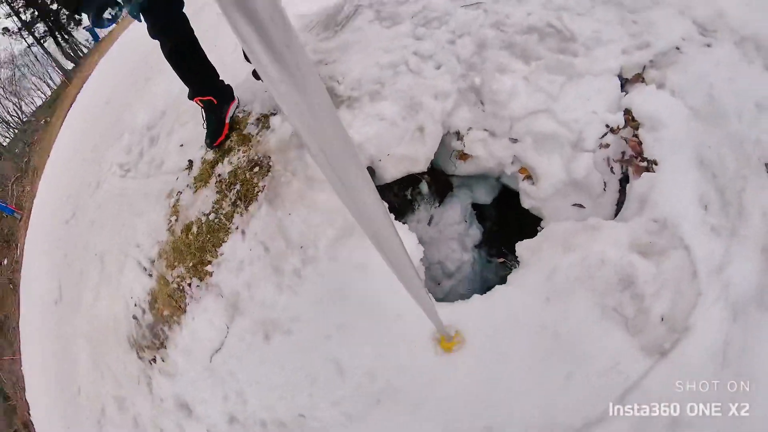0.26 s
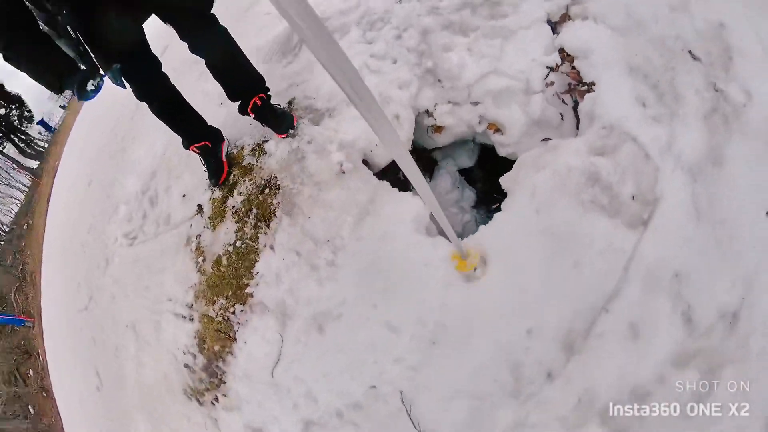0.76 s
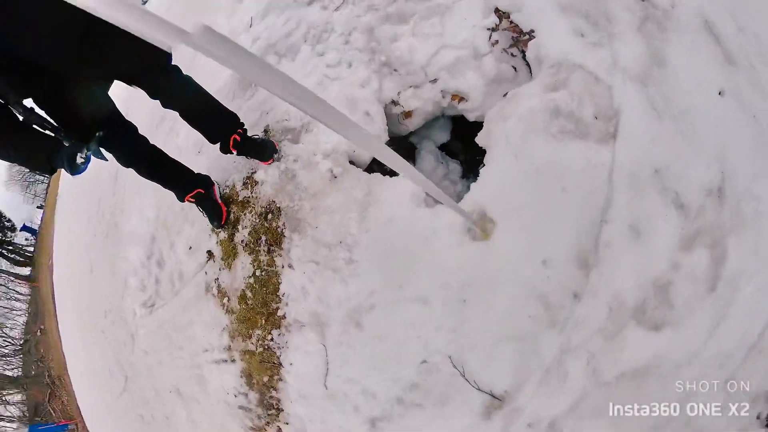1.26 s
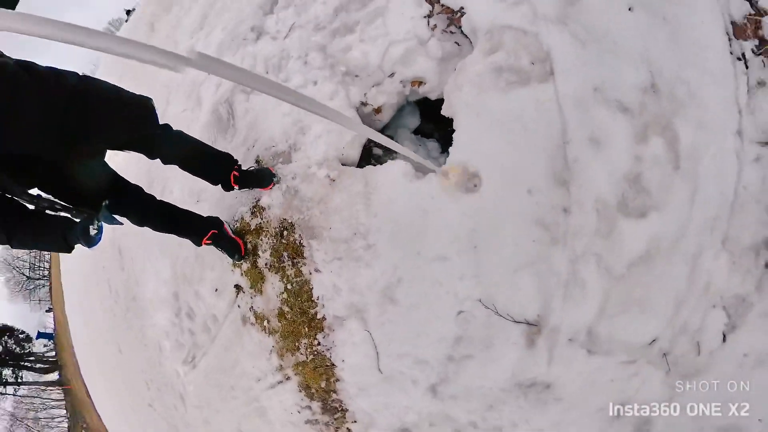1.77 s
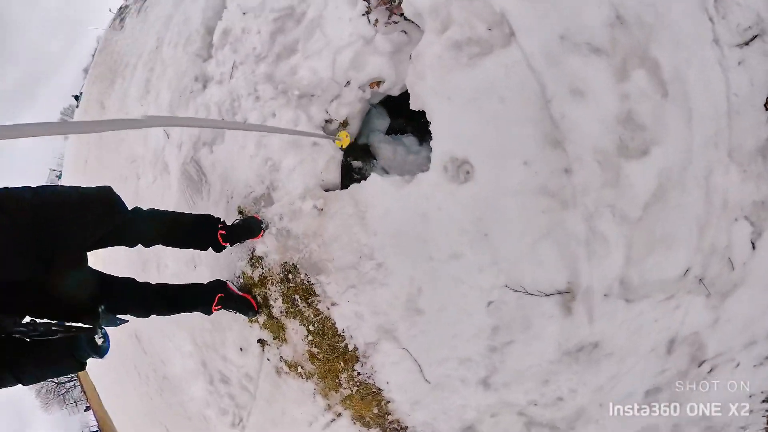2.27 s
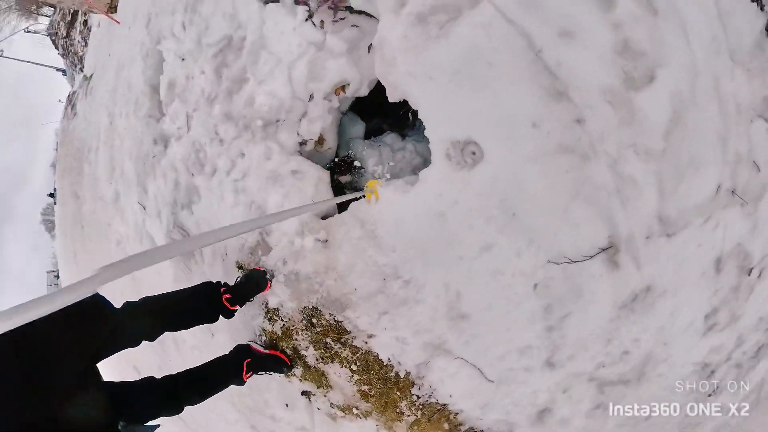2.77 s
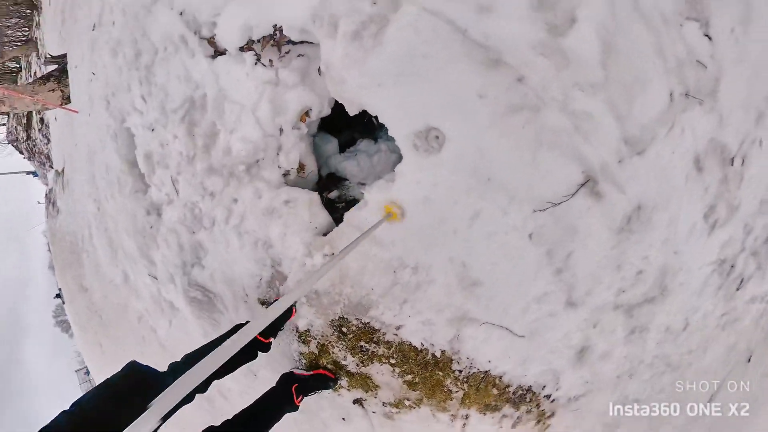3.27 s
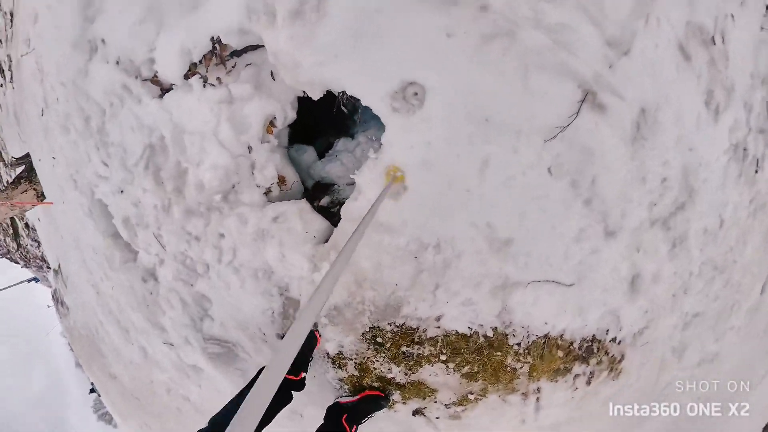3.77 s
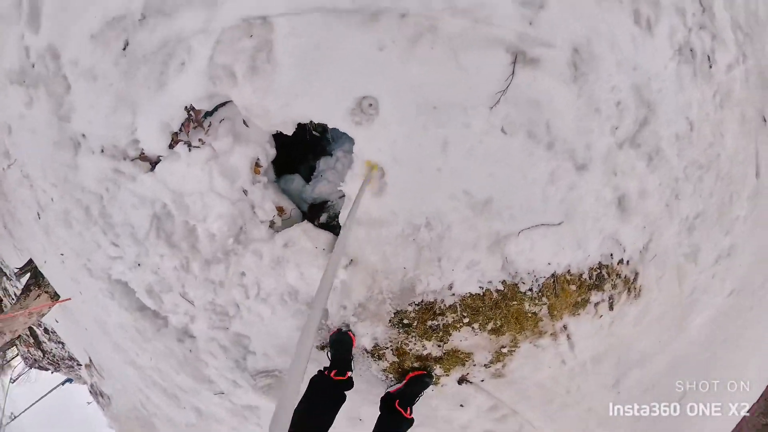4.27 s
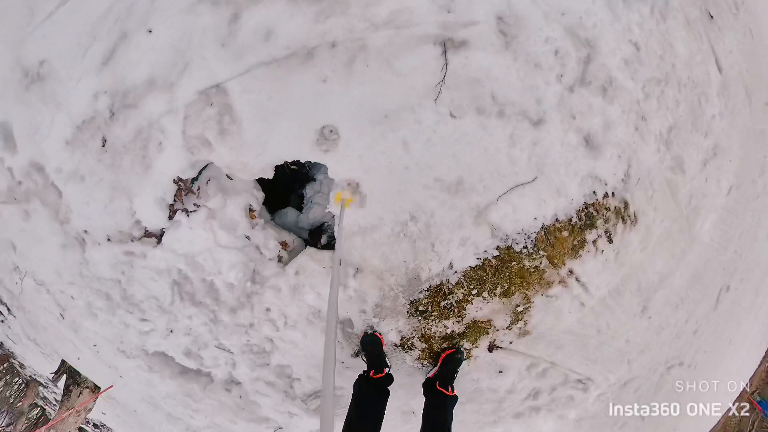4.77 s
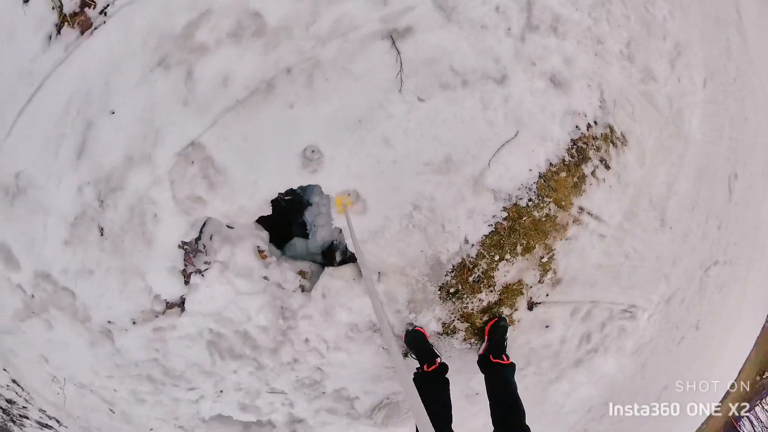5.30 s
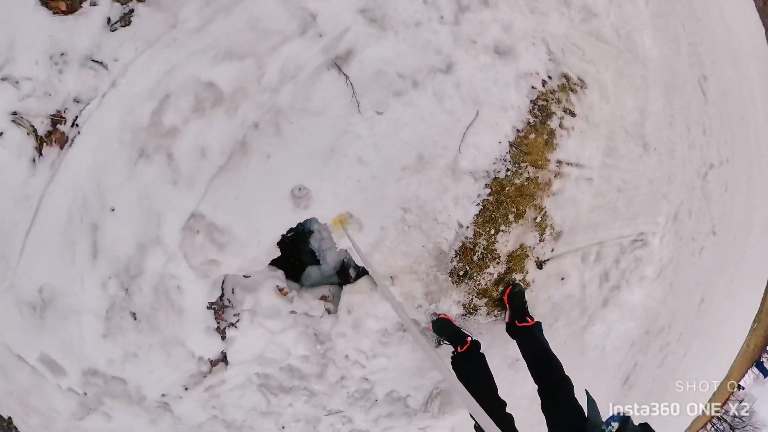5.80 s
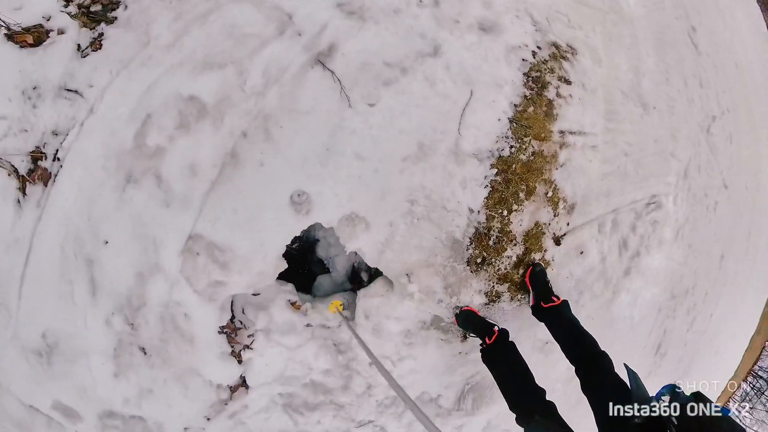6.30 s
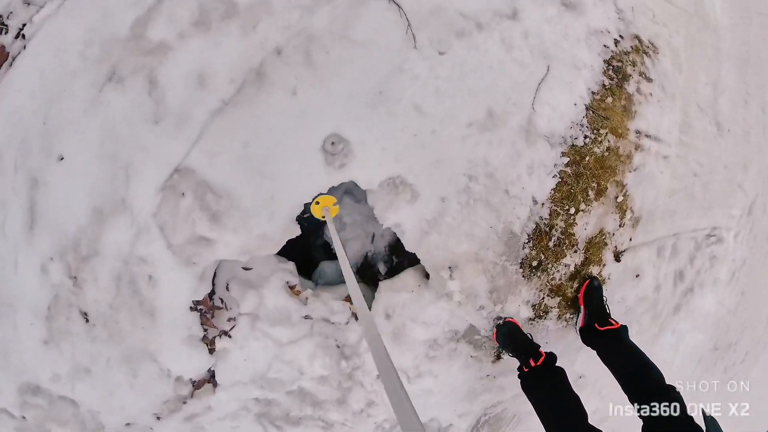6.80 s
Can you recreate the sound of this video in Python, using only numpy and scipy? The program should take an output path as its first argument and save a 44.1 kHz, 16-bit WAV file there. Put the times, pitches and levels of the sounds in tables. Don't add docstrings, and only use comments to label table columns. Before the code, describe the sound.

Outdoors on an open snowy slope, soft low wind rumble and a faint, wavering hiss begin alone. At 0.33 s a pole stabs the crust close to the microphone with a bright crack; heavier, duller crunches follow at about 0.7, 1.0, 1.3 and 1.65 s, the last with a strong low thump. Each lasts only a few hundredths of a second, then lumps settle and icy crumbs tick. Wind puffs flutter low around 0.95, 1.4 to 2.0 and 4.3 s. A jab at 2.2 s is followed by a longer pause until 2.84 s. Regular stabs resume at 3.2 and 3.5 s; at 3.83 s one brings a deep, quickly dying hollow boom. From 4.1 s crisp, sharper jabs come about every quarter second until a grainy double crunch near 6.2 s. Fine crumbs trickle briefly, leaving quiet wind until 7 s. The sound is dry, close, nearly mono, with softened extreme treble.

```python
import sys
import numpy as np
from scipy import signal
from scipy.fft import rfft, irfft
from scipy.io import wavfile

SR = 44100
rng = np.random.default_rng(int(sys.argv[2]) if len(sys.argv) > 2 else 0)


def nominal_scale(level):
    x = np.asarray(level, float) / 20
    return 10 ** x


def inscribe(sig):
    pcm = np.round(np.clip(np.atleast_2d(sig).T, -1, 1) * 32767)
    wavfile.write(sys.argv[1], SR, pcm.astype(np.int16))


N = 310905

GRAIN_HZ = np.array([np.geomspace(160, 700, 6), np.geomspace(850, 2600, 6), np.geomspace(3000, 8000, 6)])


def rms_one(x):
    return x / np.sqrt(np.mean(x ** 2) + 1e-20)


def at_hz(points, hz):
    point_hz, point_db = np.array(points).T
    return np.interp(np.log(hz), np.log(point_hz), point_db)


def drift(rate_hz):
    r = np.exp(-80 * np.pi * rate_hz / SR)
    slow = signal.lfilter([1], [1, -2 * r, r * r], rng.standard_normal(N // 40 + 2002))
    slow = slow[2000:]
    return np.interp(np.arange(N) / 40, np.arange(len(slow)), rms_one(slow))


def band(x, low_hz, high_hz, order=2):
    return signal.sosfilt(signal.butter(order, [low_hz, high_hz], "band", fs=SR, output="sos"), x)


def coloured(spectrum):
    hz = np.maximum(np.fft.rfftfreq(N, 1 / SR), 1)
    inside = (hz > spectrum[0][0]) & (hz < spectrum[-1][0])
    return rms_one(irfft(rfft(rng.standard_normal(N)) * nominal_scale(at_hz(spectrum, hz)) * inside, N))


def air():
    # time in seconds, rumble level in dB, hiss level in dB.
    wind_levels = [(0, -43, -53.5), (.7, -41, -54), (1.2, -43.5, -57), (1.7, -40.5, -54), (2.2, -44, -54.5),
                   (2.8, -45, -55.5), (3.3, -45, -57), (3.7, -45.5, -58), (3.95, -47, -56.5),
                   (4.299, -43, -58.5), (4.75, -45, -57), (5.7, -46, -58), (6.3, -47, -58),
                   (7.05, -46, -59)]
    # frequency in Hz, density in dB per Hz.
    rumble_spectrum = [(12, -51), (20, -17), (53, -0.5), (98, -11.5), (479, -24), (520, -24.5), (573, -25),
                       (1000, -35.5), (1300, -68.5), (2200, -120)]
    # frequency in Hz, density in dB per Hz.
    hiss_spectrum = [(530, -8.5), (900, -6.5), (1150, -5.5), (1280, -2.5), (1480, -5), (6560, -9),
                     (9120, -24.5), (11900, -74.5), (20100, -120)]
    s, rumble_db, hiss_db = np.transpose(wind_levels)
    t = np.arange(N) / SR
    rumble = nominal_scale(np.interp(t, s, rumble_db) + 0.45 * drift(11)) * coloured(rumble_spectrum)
    level, steady = nominal_scale(np.interp(t, s, hiss_db)), coloured(hiss_spectrum)
    edges_hz = [500, 900, 1400, 2000, 2700, 3500, 4400, 5400, 6500, 7800, 11000]
    patches = np.zeros(N)
    for low_hz, high_hz in zip(edges_hz, edges_hz[1:]):
        patch_db = 2.3 * (drift(9) + 0.4 * drift(26))
        patches += nominal_scale(patch_db) * band(steady, low_hz, high_hz, order=1)
    return rumble, level * rms_one(patches), level * coloured(hiss_spectrum)


def jab_bursts():
    # start in seconds, rms level in dB, length in ms, thud in dB, pitch of the breaking slab in Hz.
    jabs = [(0.3342, -20.5, 12.3, -6.5, 4500), (0.6871, -19, 20, -0.7, 560), (1.0103, -20, 20.8, -1.7, 604),
            (1.322, -22.5, 18.4, -2.5, 1620), (1.649, -25.5, 16, 3, 816), (2.188, -22.5, 19, -11.5, 2220),
            (2.8376, -24.5, 15.6, -1, 940), (3.2123, -23, 12, 1.7, 1550), (3.536, -21.5, 19.2, -7, 560),
            (3.8268, -18, 12.9, -3.5, 575), (4.119, -16, 6.9, -3, 1405), (4.41, -24, 17, -4, 1670),
            (4.6827, -20, 6, -5.5, 1900), (4.938, -20, 15.2, -4.5, 2220), (5.1978, -24, 10.1, -8, 2180),
            (5.4437, -25, 24.5, -14, 1380), (5.705, -19, 9.2, -4.5, 2870), (5.9491, -24.5, 8, -7.5, 1950),
            (6.176, -20.5, 29, -19.5, 1035)]
    brush_ms = 19.5
    rows = []
    for s, level_db, ms, thud_db, slab_hz in jabs:
        rows += [(s - brush_ms / 1000, -48.5, brush_ms, 5, 0),
                 (s, level_db, ms, 2.74, thud_db, slab_hz),
                 (s + ms / 1000, level_db - 21, 6.2, 0, 3)]
    return rows


def crack_bursts():
    # start in seconds, rms level in dB, length in ms, brightness in dB.
    cracks = [(0.3282, -28.5, 2.9, 19), (0.3469, -29, 10.2, -1.2), (0.3634, -32, 9.3, -15),
              (0.379, -39, 15, -14), (0.399, -40, 11, -16), (0.706, -35, 9, 10), (1.044, -22, 4, -4.5),
              (1.374, -43, 4, -3), (1.656, -22, 4.2, -4), (2.201, -23, 3.3, -1), (2.1727, -33.5, 5, -1.5),
              (2.8546, -25, 23.8, 3.5), (3.5582, -32, 1.1, 3), (3.8413, -32.5, 11, -8),
              (4.1282, -20.5, 7, -1), (4.42, -19.5, 7.2, 3.5), (4.6926, -19, 7.7, -1),
              (4.715, -41.5, 11, -3), (4.7348, -40.5, 9.6, -17), (4.9562, -27.5, 5.5, 3),
              (5.1884, -28.5, 2.7, -1), (5.4772, -34.5, 12.3, .6), (5.4975, -37, 10, 9.5),
              (5.5108, -28, 12.3, 9), (5.5498, -38, 6.7, .6), (5.5897, -40.5, 8.6, -4),
              (5.6856, -42, 22, 7), (5.9399, -34, 16.4, 1.5), (6.166, -27.5, 12, 4),
              (6.2072, -26, 23.3, -0.5)]
    return [(*row, -5) for row in cracks]


def settling_bursts():
    # start in seconds, rms level in dB, length in ms, thud in dB.
    settling = [(0.41, -42.5, 18, 13), (0.7134, -43, 24, 3.5), (1.051, -50, 18, -4),
                (1.3418, -39.5, 38, -2), (1.668, -38.5, 40, -6), (2.21, -50, 35, 0), (2.88, -48, 12, -6),
                (3.224, -48.5, 20, 4), (3.563, -47.5, 16, -1), (3.847, -53.5, 12, 4),
                (4.1408, -41.5, 28, 3.5), (4.43, -43, 42, -2), (4.701, -39, 34, 7), (4.9633, -46, 40, -1.2),
                (5.211, -43.5, 44, 2.5), (5.472, -46, 66, -9), (5.718, -42.5, 46, -3.5),
                (5.9624, -49, 32, 1.2), (6.2324, -44.5, 19, -20)]
    lump_ms, gap_ms = 10.5, 9.5
    rows = []
    for (s, level_db, ms, thud_db), luck in zip(settling, rng.standard_normal((len(settling), 8, 4))):
        for k, (late, weight, tint, size) in enumerate(luck):
            after_ms = k * gap_ms
            lump_db = level_db + 2.5 * weight - 7.5 * after_ms / ms
            lump_db -= 99 * (after_ms >= ms)
            lump_hz = 2320 * 2 ** (0.7 * size)
            rows.append((s + (after_ms + 2 * late) / 1000, lump_db, lump_ms, 3 * tint, thud_db, lump_hz))
    return rows


def crumb_bursts():
    # start in seconds, rms level in dB, length in ms, brightness in dB.
    crumbs = [(0.466, -50, 37, -4.5), (0.806, -47, 16.5, -1), (0.8357, -48, 5, -5), (1.15, -46, 20, -2.5),
              (1.391, -50, 10, -3), (1.412, -49, 9.5, -1), (1.472, -50, 13, -9.5), (1.79, -50.5, 27.5, -2),
              (3.375, -53, 25, 1), (3.675, -53.5, 30, 1), (3.973, -46.5, 25, -7), (4.258, -50, 32, -2.5),
              (4.5512, -50.5, 15.6, -12), (5.0426, -50, 14, -1.5), (5.0764, -48.5, 6, -11.5),
              (5.308, -51.5, 12, 0), (5.34, -51.5, 11, 2), (5.8151, -43, 9.5, 6), (6.06, -51.5, 9.6, -1),
              (6.0913, -46, 5, 3), (6.33, -57, 90, 11.5), (6.365, -52.5, 18, 13), (0.391, -36, 5.4, -10),
              (2.39, -70, 16, -9)]
    return [(*row, 1.5, 1300) for row in crumbs]


def tick_bursts():
    # start in seconds, rms level in dB, pitch in Hz.
    ticks = [(0.795, -46, 3530), (1.4696, -36.5, 1350), (1.5628, -45, 3100), (1.714, -52.5, 1200),
             (1.7372, -45.5, 3060), (1.799, -62, 1700), (1.869, -50, 6300), (2.4, -49, 1700),
             (2.455, -50, 5900), (2.9885, -43.5, 4500), (3.0138, -46.5, 5530), (3.32, -48, 6700),
             (4.842, -49, 1300), (5.058, -40.5, 1600), (5.324, -46, 2100), (5.5715, -48, 2000),
             (5.7807, -53, 4870)]
    return [(s, level_db, 2.8, 0, -6.5, hz, hz) for s, level_db, hz in ticks]


def burst_shapes(energy):
    rows = jab_bursts() + tick_bursts() + crack_bursts() + crumb_bursts() + settling_bursts()
    rise_ms, rise_share, fall_ms = 0.6, 0.03, 0.9
    slab_lift_db, slab_octaves = 6.0, 0.3
    shapes, colours = np.zeros((3, 6, N)), rng.standard_normal((len(rows), 3, 6))
    for (s, level_db, ms, bright_db, thud_db, *slabs), colour in zip(rows, colours):
        hold_ms = max(ms, 0.3)
        t_ms = np.arange(int((hold_ms + 10) * SR / 1000)) * 1000 / SR
        rise = 1 - np.exp(-(t_ms / (rise_ms + rise_share * hold_ms)) ** 2)
        sag = 0.3 * t_ms / hold_ms
        shape = rise * np.exp(-sag - np.maximum(t_ms - hold_ms, 0) / fall_ms)
        middle_db = level_db - 10 * np.log10(1 + nominal_scale(bright_db) ** 2)
        grain_db = middle_db + np.array([[thud_db], [0], [bright_db]]) + 2.4 * colour
        for slab_hz in slabs:
            octaves_off = np.log2(GRAIN_HZ / slab_hz)
            grain_db = grain_db + slab_lift_db * np.exp(-(octaves_off / slab_octaves) ** 2)
        span = slice(int(s * SR), int(s * SR) + len(t_ms))
        spent = energy[:, span] @ shape ** 2 / np.sum(shape ** 2)
        shapes[..., span] += (nominal_scale(grain_db) / np.sqrt(spent + 0.1))[..., None] * shape
    return shapes


def crust():
    # frequency in Hz, level in dB.
    radiation = [(180, 0.5), (400, 4), (1000, 0), (2200, 1.5), (4000, 2), (6300, 5), (8000, -39)]
    snaps_per_s, snap_spread_db, ring_cycles = 11000, 3.0, 5.0
    strengths = nominal_scale(snap_spread_db * np.minimum(rng.exponential(1, N), 4)) * rng.choice([-1, 1], N)
    clumps = nominal_scale(3.5 * drift(170))
    snaps = clumps * strengths * (rng.random(N) < snaps_per_s / SR)
    dealt = rng.integers(0, 6, N)
    hands = np.array([rms_one(snaps * (dealt == k)) for k in range(6)])
    out = np.zeros(N)
    for shapes, pitches in zip(burst_shapes(hands ** 2), GRAIN_HZ):
        for shape, own_snaps, hz in zip(shapes, hands, pitches):
            r, w = nominal_scale(-60 * hz / (ring_cycles * SR)), 2 * np.pi * hz / SR
            ring = [[1, 0.012, -0.982, 1, -2 * r * np.cos(w), r * r]] * 2
            scale = np.linalg.norm(signal.sosfilt(ring, signal.unit_impulse(4096)))
            ringing = signal.sosfilt(ring, own_snaps * shape + 1e-18)
            out += nominal_scale(at_hz(radiation, hz) - 7.5) / scale * ringing
    return out


def bend_diaphragm(rows):
    out, phases = np.zeros(N), rng.uniform(0, 2 * np.pi, len(rows))
    for (s, peak_db, hz, ms), phase in zip(rows, phases):
        half = int(3 * ms * SR / 1000)
        t = np.arange(-half, half) / SR
        bell = np.exp(-(t * 1000 / (0.45 * ms)) ** 2)
        at = int(s * SR)
        out[at - half:at + half] += nominal_scale(peak_db) * bell * np.cos(2 * np.pi * hz * t + phase)
    return out


def jolts():
    # centre in seconds, peak level in dB, pitch in Hz, length in ms.
    shakes = [(0.337, -17.5, 252, 11.3), (0.391, -36, 127, 47), (0.706, -18, 214, 7.7),
              (0.772, -32, 48.3, 62), (1.056, -24.5, 52, 17), (1.354, -22, 64.5, 42),
              (1.663, -8.5, 142, 5.5), (3.221, -38.5, 145, 51), (3.564, -45, 134, 48),
              (3.862, -19.5, 130, 12), (3.872, -32.5, 298, 31), (4.132, -27, 98, 19),
              (4.427, -21.5, 102.4, 36), (4.711, -25.5, 88.6, 23), (5.207, -22.5, 180, 3.1),
              (5.462, -19, 144, 3.8), (5.713, -17.5, 165, 1.6), (5.973, -24, 63, 17), (6.2, -47, 134, 110)]
    return bend_diaphragm(shakes)


def booms():
    # start in seconds, peak level in dB, start pitch in Hz, end pitch in Hz, 60 dB decay in seconds.
    drops = [
        (3.857, -19, 280, 40.1, 0.45),
        (1.5, -31.5, 245, 81, 0.24),
        (3.5, -34.5, 100, 50, 0.42),
        (0.8, -28, 48, 77, 0.28),
        (0.71, -42, 57, 150, 0.23),
    ]
    out, t = np.zeros(N), np.arange(SR // 2) / SR
    for s, peak_db, start_hz, end_hz, t60 in drops:
        hz = end_hz + (start_hz - end_hz) * np.exp(-t / 0.0046)
        at = int(s * SR)
        out[at:at + len(t)] += nominal_scale(peak_db - 60 * t / t60) * np.sin(2 * np.pi * np.cumsum(hz) / SR)
    return out


def gusts():
    # centre in seconds, peak level in dB, pitch in Hz.
    wind_puffs = [(0.935, -29, 76), (0.973, -29, 96), (0.987, -34, 78), (1.396, -29, 81.5),
                  (1.444, -21, 112), (1.473, -32, 81), (1.518, -26, 89), (1.57, -26, 105),
                  (1.711, -28, 115), (1.857, -29, 80.6), (1.91, -23, 131), (1.97, -30, 75),
                  (1.999, -29.5, 85), (3.32, -31.5, 62), (3.408, -24, 92), (3.493, -30, 86),
                  (3.667, -27.5, 97), (4.201, -30, 63), (4.239, -30.5, 78), (4.28, -23, 96),
                  (4.347, -18, 96), (4.376, -22, 79.5), (5.49, -32.4, 85)]
    cycles = 1.18
    return bend_diaphragm([(s, peak_db, hz, cycles * 1000 / hz) for s, peak_db, hz in wind_puffs])


def scene():
    rumble, hiss, other_hiss = air()
    crunch = crust()
    mid = rumble + hiss + crunch + jolts() + booms() + gusts()
    side = nominal_scale(-7) * band(other_hiss, 3000, 6200, order=8)
    side += nominal_scale(-22) * band(np.roll(crunch, 90), 1800, 7000, order=3)
    return np.array([mid + side, mid - side])


def roll_off(x):
    return signal.sosfilt(signal.butter(12, 9270, fs=SR, output="sos"), x)


def record(dry):
    dull = signal.sosfilt(signal.butter(4, 7800, fs=SR, output="sos"), dry)
    cut = signal.sosfilt(signal.cheby2(8, 40, 10200, fs=SR, output="sos"), dull)
    mix = 0.61 * np.tanh(cut / 0.8)
    return roll_off(mix)


dry = scene()
out = record(dry)
inscribe(out)
```